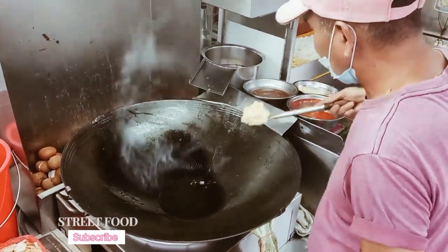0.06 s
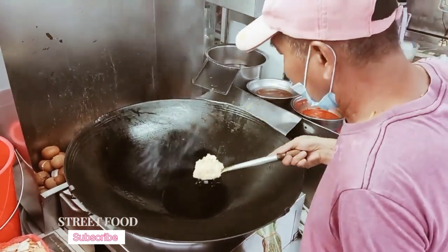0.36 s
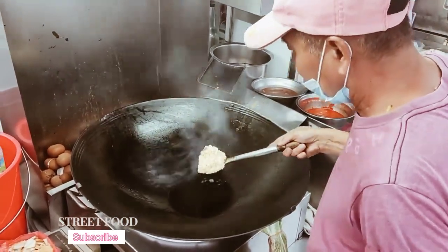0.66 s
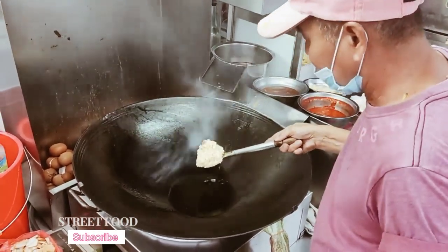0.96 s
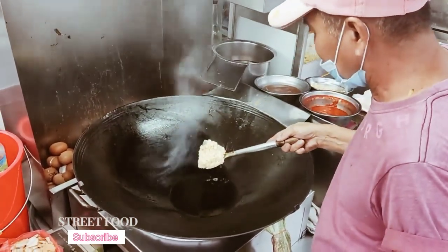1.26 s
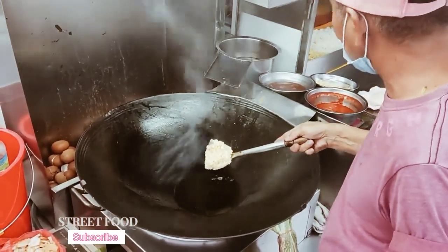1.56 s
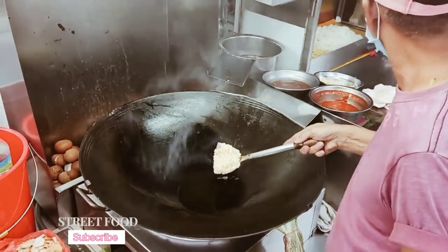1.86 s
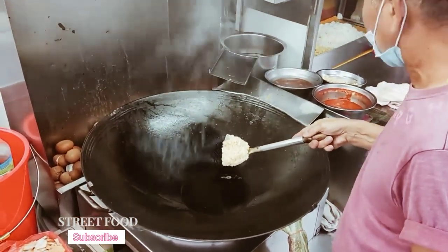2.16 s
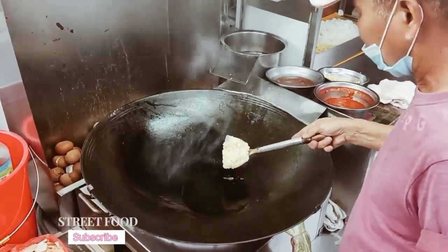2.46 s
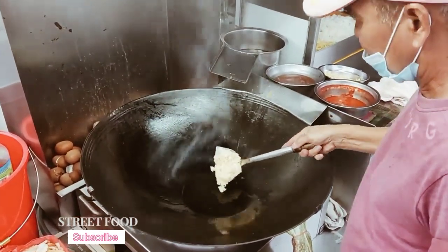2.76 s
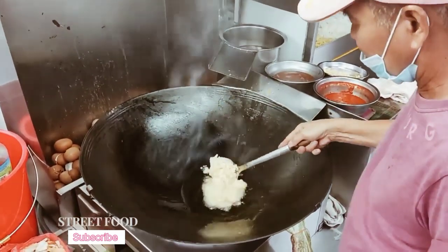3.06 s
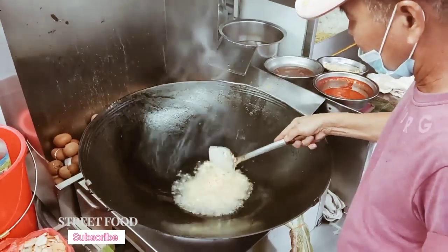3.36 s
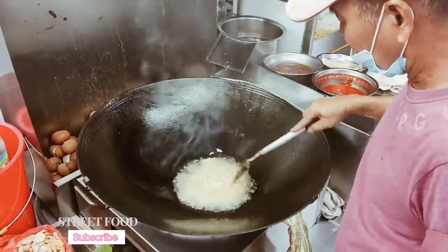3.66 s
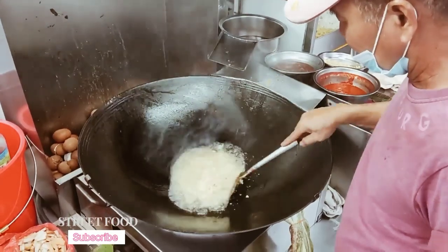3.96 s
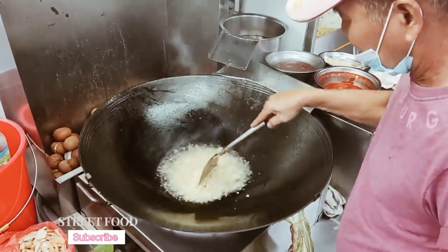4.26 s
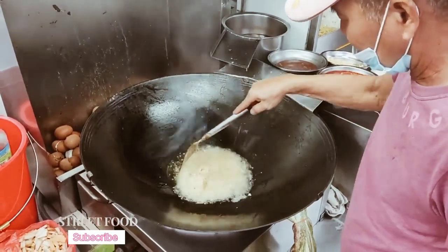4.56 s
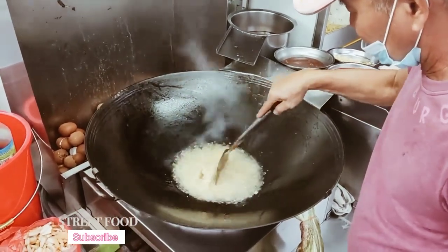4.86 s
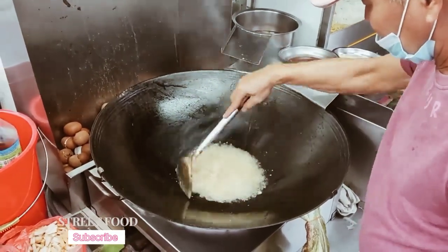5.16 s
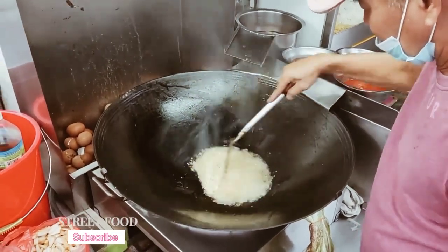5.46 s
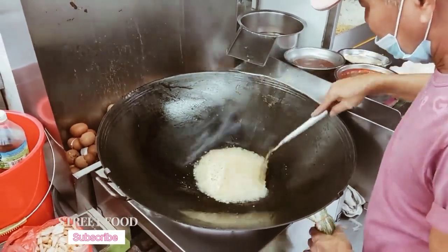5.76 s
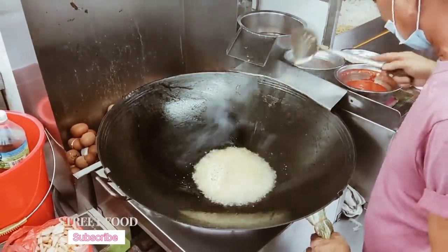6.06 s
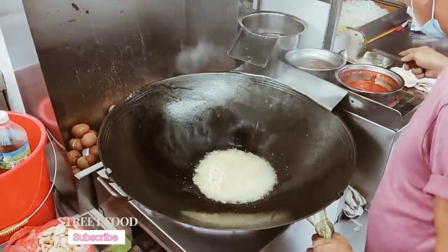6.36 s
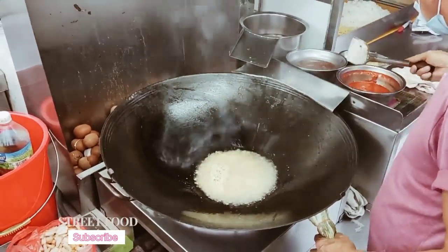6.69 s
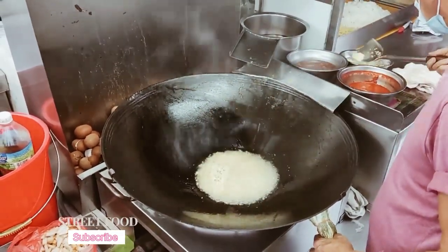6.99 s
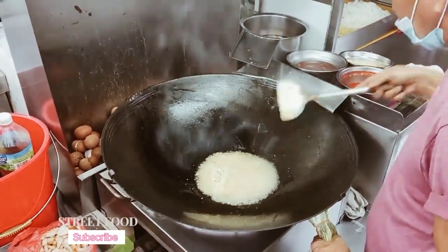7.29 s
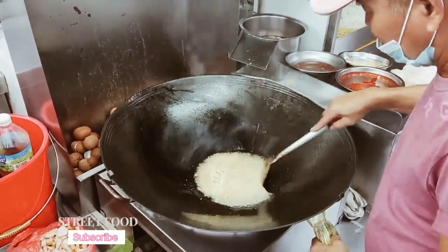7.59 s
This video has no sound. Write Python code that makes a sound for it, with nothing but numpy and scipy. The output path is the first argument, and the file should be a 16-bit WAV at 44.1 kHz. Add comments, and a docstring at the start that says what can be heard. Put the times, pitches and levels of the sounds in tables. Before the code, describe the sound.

Close to the stove at a street food stall, a gas burner gives a steady low hum and roar beneath the hiss of a hot wok. Batter hits the oil and fizzes up, followed by a run of ringing metal knocks and short gritty scrapes from a stirring ladle. The frying then sinks to a soft simmer over a slightly easing flame, until the ladle briefly knocks against the wok again.

```python
"""A street stall, close to a steel wok, heard through a camera's two microphone ports.
From the start a forced-air gas burner drones and roars under the hissing wok, and the oil spits a little.
Near 3 s batter slides into the hot oil and sizzles; a steel ladle knocks and rubs as it stirs, and the
camera's limiter ducks the burner after each hard knock. Before 6 s the ladle rests and the batter sinks
to a simmer over an easing flame; a last few knocks come at 7.5 s."""
import sys
import numpy as np
from scipy import signal
from scipy.fft import rfft, irfft
from scipy.io import wavfile
from scipy.ndimage import uniform_filter1d, minimum_filter1d

SR = 44100
rng = np.random.default_rng(int(sys.argv[2]) if len(sys.argv) > 2 else 0)


def generate_wav(sig):
    """Save sig (samples, or channels by samples) to the path in sys.argv[1] as 16-bit PCM at SR."""
    pcm = np.round(np.clip(np.atleast_2d(sig).T, -1, 1) * 32767).astype(np.int16)
    wavfile.write(sys.argv[1], SR, pcm)


N = 340893
TIME = np.arange(N) / SR
BAND_LIMIT_HZ = 15000

# The blower's hum. Each row: multiple of its pitch, rms level in dB.
BLOWER_PARTIALS = [(1, -20.7), (2, -46), (4, -53), (7, -52.5)]
# The flame swells, then eases once the batter is in. Each row: time in seconds, gain in dB.
FLAME_STRENGTH = [(0, -0.78), (.9, 0.6), (2.1, 1.08), (3.3, 0.85), (3.9, -1.24), (5.3, -1.6), (7.73, -2.5)]
# The stove's tones. Each row: pitch in Hz, base level in dB, wander in Hz, dB gained per dB of flame.
STOVE_PARTIALS = [(75.4, -28.8, .7, 0), (254.5, -41.7, 2.0, .3), (329.6, -34.1, 1.1, 2.1),
                  (477.8, -46.5, .8, 2.5)]
# The whine of the burner's jet. Each row: time in seconds, rms level in dB.
WHINE_LEVEL = [(0, -45), (.6, -41.5), (2.7, -42), (3.1, -40.5), (3.5, -38.5), (3.75, -45.5), (5.5, -47.5),
               (7.3, -51), (7.73, -62)]
# Resonances of the gap between wok and stove. Each row: centre in Hz, width in Hz, gain in dB.
GAP_RESONANCES = [(344, 33, 4), (510, 28, 1.5), (666, 34, -2.5), (847, 85, 4.5), (1233, 64, 4),
                  (1657, 76, 5), (1904, 51, 4.5)]
# Noise colours. Each row: frequency in Hz, relative density in dB.
RUMBLE_SPECTRUM = [(18, -25), (35, -16), (47, -5.5), (54, -6.5), (64, -2.5), (80, 3.5), (90, -1),
                   (108, -7.5), (135, -8), (152, -6), (220, -17.8), (400, -52)]  # flame under the wok
ROAR_SPECTRUM = [(60, -7.5), (160, -5.5), (260, -1.5), (300, -2.5), (400, -5), (560, -7.5), (740, -8.5),
                 (880, -11), (1040, -14.5), (1180, -13), (1700, -16), (2400, -17.5), (3000, -22.8),
                 (12000, -33)]  # flame escaping round the rim
HISS_SPECTRUM = [(300, 3.5), (1000, -15), (1600, -6), (2400, -2.5), (4000, -4.5), (6000, -3), (8000, 0.5),
                 (10000, 1.5)]  # the hot wok
FIZZ_SPECTRUM = [(300, -3), (1000, -15), (1600, -7), (2400, -3), (4000, -4), (5600, -2), (8000, -.5),
                 (10500, 3), (13500, 5)]  # wet batter in oil
TICK_SPECTRUM = [(300, -10), (1500, -2), (4300, -5), (6400, 4), (8500, 0), (12000, 1)]  # a short bright tick
CLASH_SPECTRUM = [(150, -19), (500, -2), (800, -8), (1050, -2), (1600, -0.5), (2500, 3.3), (3300, 3),
                  (6000, 3.5), (9300, 6.8), (12000, 2.5)]  # the crowd of thin-steel modes in a knock
GRIT_SPECTRUM = [(1000, -12), (2000, 1), (3500, 0), (6000, 0), (12000, -8)]  # steel dragged over steel
# Batter meets hot oil, poured in, then stirred. Each row: start in seconds, length in seconds, level in dB.
BATTER_BURSTS = [(2.87, .55, -32.7), (3.85, 1.63, -42.5)]
# Short bright ticks: three spits of oil, then three light ladle taps in the sizzling batter.
# Each row: start in seconds, level in dB.
BRIGHT_TICKS = [(0.151, -34.5), (1.533, -33.5), (2.03, -39), (3.046, -23), (3.220, -27.5), (3.403, -24.5)]
# Modes of the ladle's bowl. Each row: ratio to its pitch, relative level in dB.
BOWL_MODES = [(.89, -12.5), (.955, -3), (1, -1), (1.045, -6), (1.13, -10)]
# Ringing steel. Each row: frequency in Hz, relative level in dB, t60 in seconds.
RIM_MODES = [(1900, -5.5, .06), (2140, -5, 0.081), (2440, 0, .08), (2630, -7, .053), (2867, -6.5, .07)]  # the ladle's rim
WOK_MODES = [(1685, 3, .2), (1900, 3.5, 0.12), (2620, 0, 0.098), (2854, 3, 0.11), (3080, 0, 0.066),
             (4400, -3, .09), (6057, 0, .08), (6290, -1, .08), (7160, 0, .06)]  # the wok's bright ring
BELLY_MODES = [(328, -1, .06), (460, -4, .04), (620, -3.5, 0.048), (813, -0.5, 0.048), (960, -6, 0.045),
               (1124, -5.5, 0.063), (1300, -3.5, 0.053)]  # the dull thud of the wok's belly
# Ladle strikes wok. Each row: start in seconds, strength in dB, skid in seconds, clash t60 in seconds,
# bowl pitch in Hz, bowl ring in dB, bowl t60 in seconds, rim ring in dB, wok ring in dB,
# belly thud in dB, clash tilt in dB per octave.
LADLE_KNOCKS = [ (3.047, -31, .005, .08, 1400, -1, .1, -1, -19, -8, 0),
                (3.223, -28, .004, .08, 1530, 1.5, .08, -5, -19, -12, 0),
                (3.409, -28, .01, .09, 1566, -1, .14, -7, -19, -16, 0),
                (3.7365, -15, .005, .12, 1630, -2.5, .15, -9, -14, -17, .5),
                (3.762, -12.5, .01, .095, 1640, -4, .21, -13, -13, -16, .8),
                (4.000, -13, .006, .125, 1505, -4, .16, -17, -17, -14, 1.2),
                (4.2512, -14.5, .0022, .075, 1450, 2, .08, -9, -19, -7, 1.2),
                (4.495, -19, .006, .08, 1493, -6, .08, -18, -20, -13, .3),
                (4.500, -14, .0024, .085, 1590, -10, .14, -18, -21, -20, .5),
                (4.7232, -14.5, .005, .085, 1650, -1.5, .086, -2, -17, -5, .3),
                (4.9355, -16.5, .005, .07, 1470, 2.5, .075, -2, -18, -7, -.5),
                (5.2305, -26, .001, .04, 1560, -6, .05, -6, -19, -4, 0),
                (5.2351, -18.5, .006, .07, 1560, -1, .064, -4, -13, -3, -1.5),
                (5.244, -18.5, .004, .06, 1480, -2, .07, -3, -12, -3, -1.5),
                (5.667, -9.5, .009, .085, 1563, -3, .12, -10, -14, -7, .6),
                (7.5366, -18.3, .008, .06, 1560, -.5, .07, -7, -12, -6, -1.3),
                (7.547, -22.5, .003, .045, 1720, -.5, .11, -10, -10, -12, -1.2),
                (7.596, -24, .004, .1, 1700, 2.5, .13, -10, -12, -10, -.7)]
# The ladle slides through batter and over steel. Each row: start in seconds, length in seconds,
# pitch in Hz, level in dB, grit in dB relative to the pitched scrape.
LADLE_RUBS = [(3.407, .06, 1570, -37, -12), (3.742, .09, 1655, -22, -4), (3.79, .06, 1660, -33, -12),
              (4.012, .07, 1690, -24, -9), (4.26, .038, 1670, -29, -12), (4.64, .11, 1900, -44, -8),
              (4.73, .04, 1680, -31, -4), (5.08, .11, 1690, -41, -12), (5.25, .055, 2400, -32, -14),
              (5.25, .057, 1750, -31, -14), (5.4, .06, 1640, -38, -8), (7.603, .05, 1700, -29.5, -14)]
# The paths to the two ports. Each row: frequency in Hz, lead of the left port in radians.
PORT_LEAD = [(0, 0), (300, -.03), (690, -.35), (1500, -.05), (2600, .5), (4050, .6), (4850, 3), (5650, 6.2),
             (6200, 6.35), (8440, 9.1), (8800, 9.4), (9350, 9.45), (11400, 11.6), (12000, 12.2)]
# How alike the ports hear the stall. Each row: frequency in Hz, coherence from 0 to 1.
PORT_COHERENCE = [(30, .998), (120, .998), (300, .985), (750, .78), (1050, .76), (1600, .93), (2100, .82),
                  (3000, .45), (4700, .48), (6000, .95), (7300, .78), (8300, .88), (8800, .99), (9400, .99),
                  (10000, .84), (11400, .8), (12000, .92)]
# The dull top end: treble falls away steeply above 11 kHz. Each row: frequency in Hz, gain in dB.
TREBLE_ROLLOFF = [(10600, 0), (11300, -3), (12000, -8.5), (13000, -15.5), (14000, -26), (15000, -38)]


def gain_of(db):
    """Decibels to gain."""
    return 10 ** (np.asarray(db) / 20)


def unit_rms(x):
    """Scales to rms 1."""
    return x / np.sqrt(np.mean(x ** 2) + 1e-20)


def at_frequency(rows, hz):
    """Reads a table on a log-frequency axis."""
    row_hz, value = np.transpose(rows)
    return np.interp(np.log(hz + 1), np.log(row_hz + 1), value)


def over_time(rows):
    """Reads a time curve at every sample."""
    return np.interp(TIME, *np.transpose(rows))


def add(mix, start_s, sound):
    """Mixes a sound in at start_s."""
    part = mix[..., round(start_s * SR):][..., :sound.shape[-1]]
    part += sound[..., :part.shape[-1]]


def coloured(x, spectrum):
    """Shapes x by a spectrum below the band limit, at rms 1."""
    size = x.shape[-1]
    hz = np.fft.rfftfreq(size, 1 / SR)
    return unit_rms(irfft(rfft(x) * gain_of(at_frequency(spectrum, hz)) * (hz < BAND_LIMIT_HZ), size))


def drift(rate_hz, size=N):
    """Random wander of rms 1, with changes up to about rate_hz."""
    hz = np.fft.rfftfreq(size, 1 / SR)
    return unit_rms(irfft(rfft(rng.standard_normal(size)) * (hz > 0) / (1 + (hz / rate_hz) ** 4), size))


def drone(flame_db, blower_hz=118.9, sag_per_db=.002, build_s=.58):
    """The blower hums; the stove's wandering tones sing louder and a little lower as the flame grows."""
    turns = np.cumsum(blower_hz + .438 * drift(6.24)) / SR
    hum = sum(gain_of(db + .7 * drift(11)) * np.sin(2 * np.pi * k * turns) for k, db in BLOWER_PARTIALS)
    build_db = -7.5 * np.exp(-TIME / build_s)  # the stove's tones start weak
    for hz, db, wander_hz, follow in STOVE_PARTIALS:
        turns = np.cumsum(hz * (1 - sag_per_db * flame_db) + wander_hz * drift(9.2)) / SR
        hum += gain_of(db + build_db + follow * flame_db + 1.5 * drift(6.9)) * np.sin(2 * np.pi * turns)
    return np.sqrt(2) * hum


def jet_whine(pitch_hz=827.5):
    """A thin, slightly wavering whine from the burner's jet."""
    turns = np.cumsum(pitch_hz + 2 * drift(9)) / SR
    return np.sqrt(2) * gain_of(over_time(WHINE_LEVEL) + .8 * drift(7.5)) * np.sin(2 * np.pi * turns)


def stove_gap(roar):
    """The gap under the wok lifts a few narrow bands of the roar and dips one."""
    hz = np.fft.rfftfreq(N, 1 / SR)
    lift_db = sum(db / (1 + (2 * (hz - centre) / width) ** 2) for centre, width, db in GAP_RESONANCES)
    return irfft(rfft(roar) * gain_of(lift_db), N)


def burner():
    """The bed of the scene: a steady rumble under the wok, and flame fluttering out round its rim."""
    flame_db = over_time(FLAME_STRENGTH)
    rumble = gain_of(-28.8) * coloured(rng.standard_normal((2, N)), RUMBLE_SPECTRUM)
    flutter_db = 1.31 * drift(59) + .28 * drift(2.9)
    roar = gain_of(-32 + flame_db + flutter_db) * coloured(rng.standard_normal((2, N)), ROAR_SPECTRUM)
    out = rumble + stove_gap(roar)
    out[0] += drone(flame_db) + jet_whine()  # the tones are common to both ports
    return out


def bubbles(per_s, spread_db, spectrum):
    """Tiny steam bubbles burst at random, a few much louder than the rest."""
    strength = gain_of(spread_db * np.minimum(rng.exponential(1, (2, N)), 5))
    polarity = rng.choice([-1, 1], (2, N))
    bursts = rng.random((2, N)) < per_s / SR
    return coloured(strength * polarity * bursts, spectrum)


def frying_gain(simmer_db=-49, attack_s=.03, release_s=.3, splash_db=-27.5, splash_s=.11):
    """Wet batter flares up in the oil, holds and dies back to a simmer; each knock jolts it up briefly."""
    pour_s = BATTER_BURSTS[0][0]
    power = gain_of(simmer_db) ** 2 * (TIME > pour_s)
    for start_s, length_s, db in BATTER_BURSTS:
        attack = np.clip((TIME - start_s) / attack_s, 0, 1)
        release = np.exp(-np.maximum(TIME - start_s - length_s, 0) / release_s)
        power += (gain_of(db) * attack * release) ** 2
    t = TIME[:SR // 2]
    for start_s, strength_db, *_ in LADLE_KNOCKS:
        add(power, start_s, (gain_of(strength_db + splash_db) * np.exp(-t / splash_s)) ** 2)
    return np.sqrt(power)


def sizzle(tick_t60=.096):
    """The hot wok hisses all along; batter adds a brisk fizz; oil spits and light ladle taps tick."""
    hiss = bubbles(per_s=14000, spread_db=2, spectrum=HISS_SPECTRUM)
    fizz = bubbles(per_s=3500, spread_db=2.8, spectrum=FIZZ_SPECTRUM)
    out = gain_of(-43 + 1.55 * drift(27)) * hiss
    out += frying_gain() * gain_of(1.2 * drift(35)) * fizz
    t = TIME[:SR // 8]
    for start_s, db in BRIGHT_TICKS:
        tick = coloured(rng.standard_normal((2, len(t))), TICK_SPECTRUM)
        add(out, start_s, gain_of(db - 60 * t / tick_t60) * tick)
    return out


def ringing(modes, t):
    """Struck steel rings in dying sines; each point of contact favours and detunes them differently."""
    chance = rng.uniform(-1, 1, (len(modes), 2)) * [3, .012]
    out = np.zeros((2, len(t)))
    for (hz, db, t60), (favour_db, detune) in zip(modes, chance):
        turns = hz * (1 + detune) * t + rng.random((2, 1))
        out += gain_of(db + favour_db - 60 * t / t60) * np.sin(2 * np.pi * turns)
    return out


def rub(length_s, pitch_hz, db, grit_db, width_hz=280):
    """A gritty rub, whose uneven friction sings in a narrow band of the ladle's bowl."""
    size = round(length_s * SR)
    bowl = signal.iirpeak(pitch_hz, pitch_hz / width_hz, SR)
    scrape = signal.lfilter(*bowl, signal.lfilter(*bowl, rng.standard_normal((2, size))))
    grit = gain_of(grit_db) * coloured(rng.standard_normal((2, size)), GRIT_SPECTRUM)
    slips = unit_rms(gain_of(2.5 * drift(250, size)))
    pressure = np.sin(np.pi * np.linspace(0, 1, size) ** .55) ** 2  # hardest early, then easing off
    return gain_of(db) * pressure * slips * (scrape / scrape.std(1, keepdims=True) + grit)


def knock(strength_db, skid_s, clash_t60, pitch_hz, bowl_db, bowl_t60, rim_db, wok_db, belly_db, tilt_db):
    """The ladle's edge cracks down and chatters; a glancing blow rings on, a head-on one thuds."""
    t = TIME[:SR // 3]
    fade_db = -60 * np.maximum(t - skid_s, 0) / clash_t60
    grip = 1 - np.exp(-t / (.15 * skid_s))  # a long skid builds up more slowly
    crack = gain_of(-5) * np.exp(-t / .0007)  # the first touch of steel on steel
    chatter = rng.standard_normal((2, len(t))) * gain_of(1.6 * drift(360, len(t)))
    tilted = [(hz, db + tilt_db * np.log2(hz)) for hz, db in CLASH_SPECTRUM]
    clash = gain_of(fade_db) * (grip + crack) * coloured(chatter, tilted)
    bowl = ringing([(pitch_hz * ratio, db, bowl_t60) for ratio, db in BOWL_MODES], t)
    bowl *= gain_of(2.2 * drift(150, len(t)))  # it rattles while it touches the wok
    blow = gain_of(bowl_db - 60 * t / bowl_t60)
    bowl *= np.linalg.norm(blow) / np.linalg.norm(bowl, axis=1, keepdims=True)  # the blow sets its energy
    wok = gain_of(wok_db) * ringing(WOK_MODES, t)
    rim = gain_of(rim_db) * ringing(RIM_MODES, t)
    rim *= unit_rms(gain_of(3.5 * drift(220, len(t))))  # the rim rattles against the wok
    belly = gain_of(belly_db) * ringing(BELLY_MODES, t)
    ring_rise = 1 - np.exp(-t / .0011)
    return gain_of(strength_db) * (clash + (bowl + wok + rim + belly) * ring_rise)


def ladle(apart_db=-2):
    """Knocks and rubs near the microphones, reaching both ports more alike than the roar and hiss do."""
    out = np.zeros((2, N))
    for start_s, *blow in LADLE_KNOCKS:
        add(out, start_s, knock(*blow))
    for start_s, *stroke in LADLE_RUBS:
        add(out, start_s, rub(*stroke))
    return out * gain_of([[0], [apart_db]])


def stall_echoes(x, wet_db=-13, t60=.079, echoes_per_s=2000, delay_s=.004):
    """Adds short, dense echoes from the steel walls round the stove."""
    t = TIME[:SR // 3]
    taps = rng.standard_normal((2, len(t))) * (rng.random((2, len(t))) < echoes_per_s / SR)
    tail = taps * (t > delay_s) * gain_of(-60 * t / t60)
    return x + gain_of(wet_db) * signal.fftconvolve(x, tail / np.linalg.norm(tail[0]), axes=1)[:, :N]


def microphone_ports(pair):
    """Makes left and right: row 0 is common to both, row 1 sets them apart; their paths differ in phase."""
    hz = np.fft.rfftfreq(N, 1 / SR)
    coherence = np.clip(at_frequency(PORT_COHERENCE, hz), 0, 1)
    shares = np.sqrt([(1 + coherence) / 2, (1 - coherence) / 2])
    common, apart = rfft(pair) * shares * gain_of(at_frequency(TREBLE_ROLLOFF, hz))
    half_lead = np.exp(.5j * at_frequency(PORT_LEAD, hz))
    return irfft([(common + apart) * half_lead, (common - apart) / half_lead], N)


def scene():
    """Burner, oil and ladle from close beside the stove."""
    return microphone_ports(burner() + stall_echoes(sizzle() + ladle()))


def limiter(x, limit_db=-19.7, hold_s=.11, recover_db_per_s=130, listen_hz=3000):
    """The gain drops at once when the treble passes the limit, holds, then comes back quickly."""
    treble = signal.lfilter(*signal.butter(2, listen_hz, "high", fs=SR), x)
    level_db = 10 * np.log10(abs(uniform_filter1d((treble ** 2).mean(0), size=180)) + 1e-12)
    hold = round(hold_s * SR)
    over_db = -minimum_filter1d(np.minimum(limit_db - level_db, 0), hold, origin=(hold - 1) // 2)
    recovery_db = recover_db_per_s * TIME
    cut_db = np.maximum.accumulate(over_db + recovery_db) - recovery_db
    return x * gain_of(-uniform_filter1d(cut_db, size=60))


def record(dry):
    """The camera's limiter, a soft ceiling on the sharpest peaks, then its band limit."""
    ducked = limiter(dry)
    rounded = ducked / (1 + (ducked / .5) ** 6) ** (1 / 6)
    lowpass = signal.firwin(511, BAND_LIMIT_HZ, window=("kaiser", 9), fs=SR)
    return signal.oaconvolve(rounded, lowpass[None], "same")


dry = scene()
out = record(dry)
generate_wav(out)
```